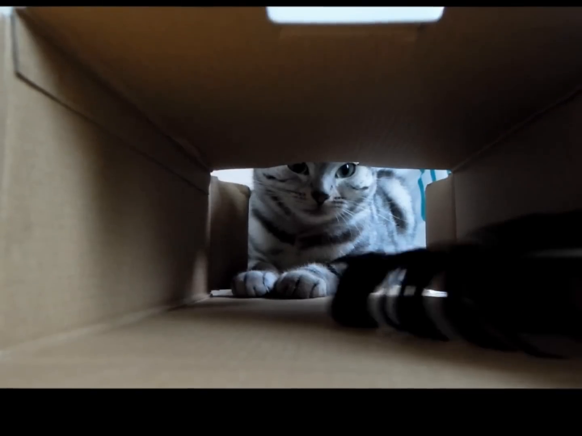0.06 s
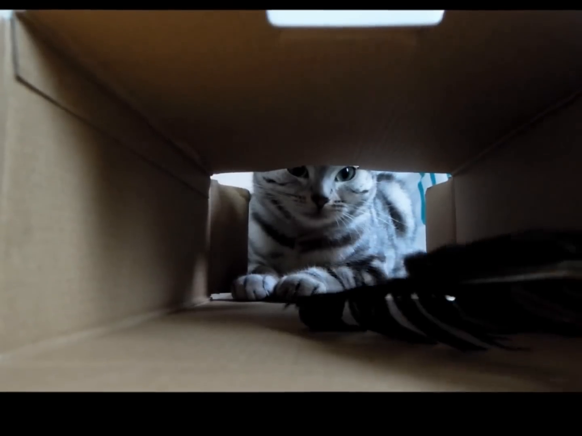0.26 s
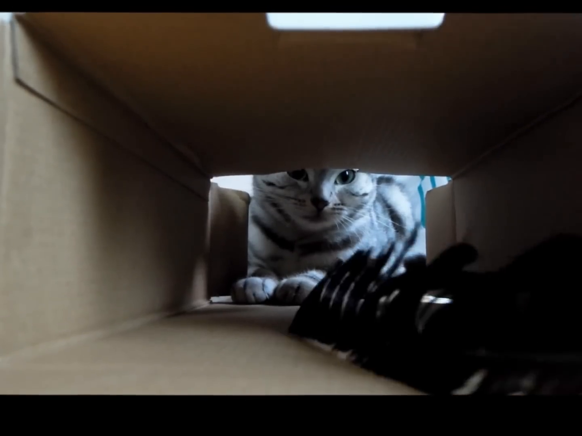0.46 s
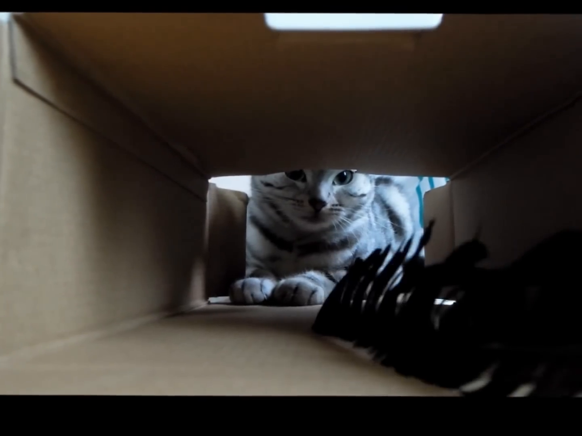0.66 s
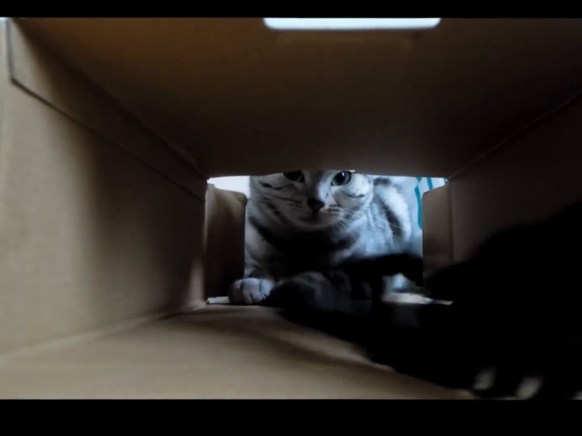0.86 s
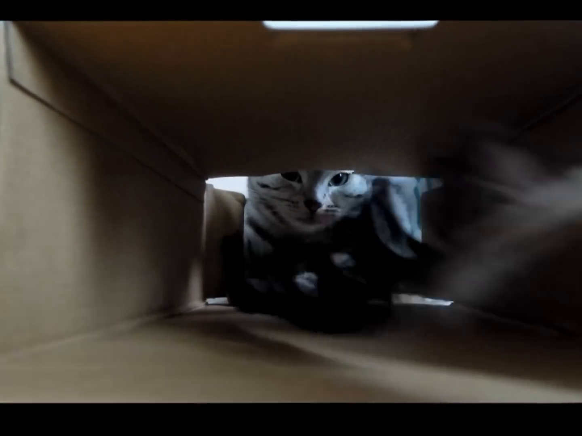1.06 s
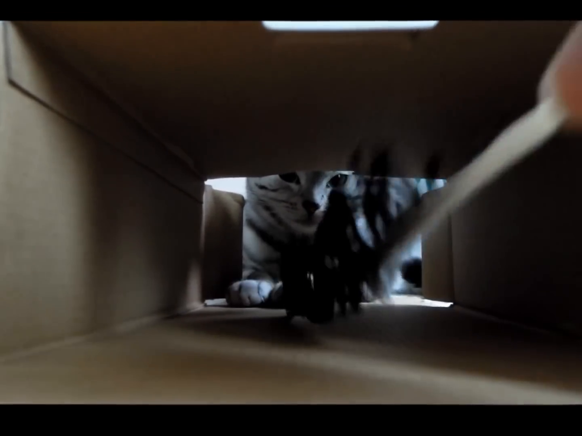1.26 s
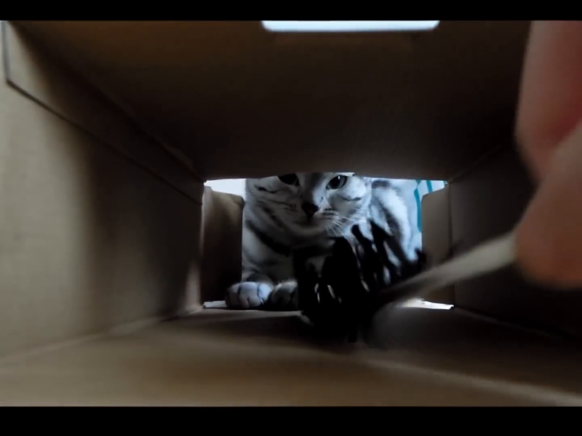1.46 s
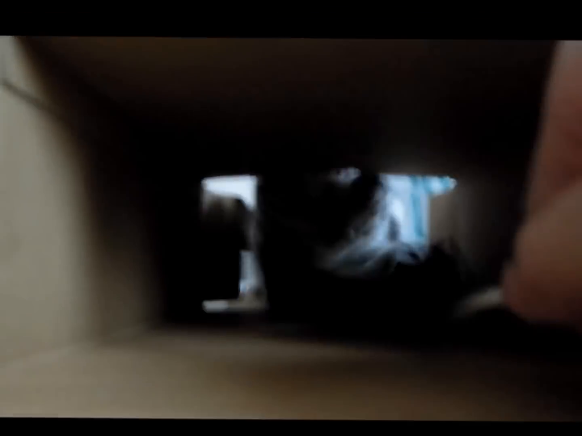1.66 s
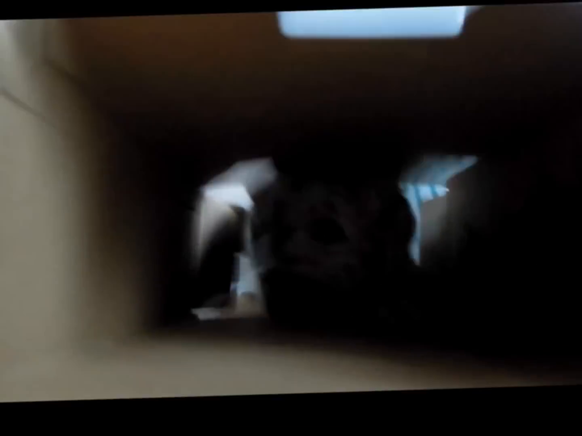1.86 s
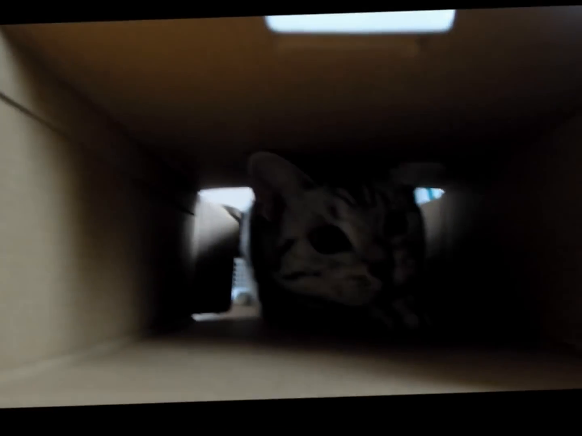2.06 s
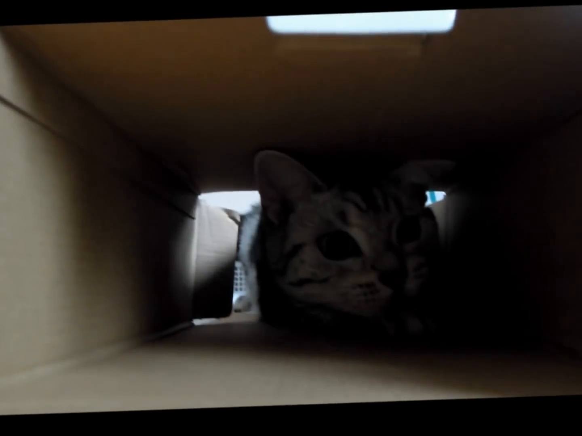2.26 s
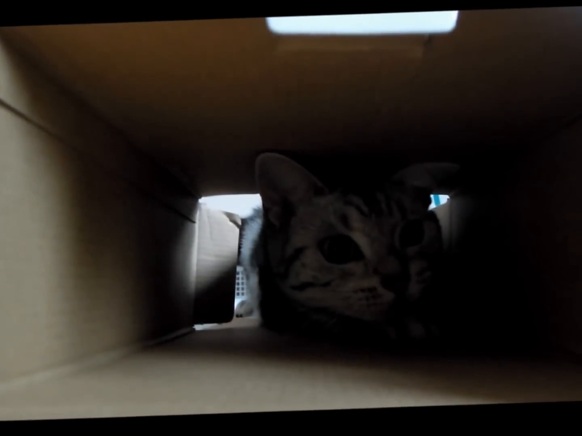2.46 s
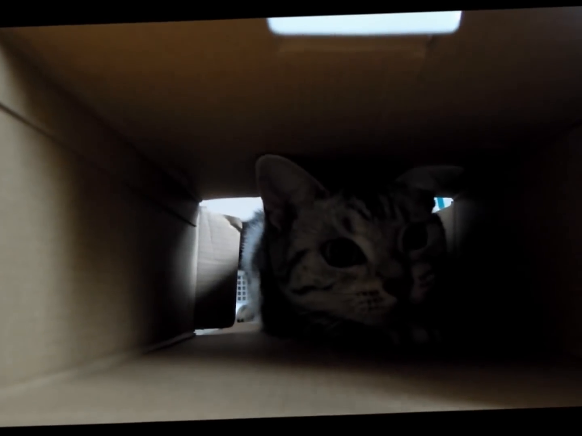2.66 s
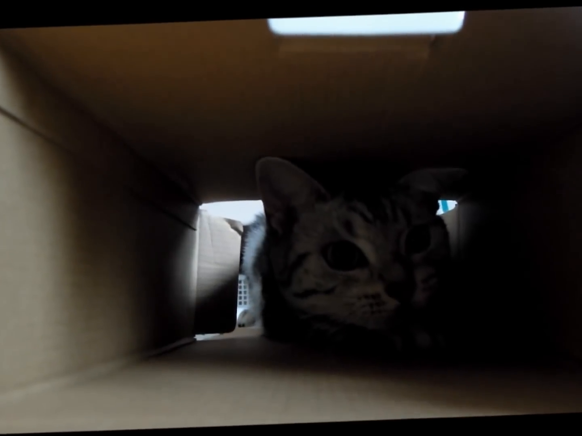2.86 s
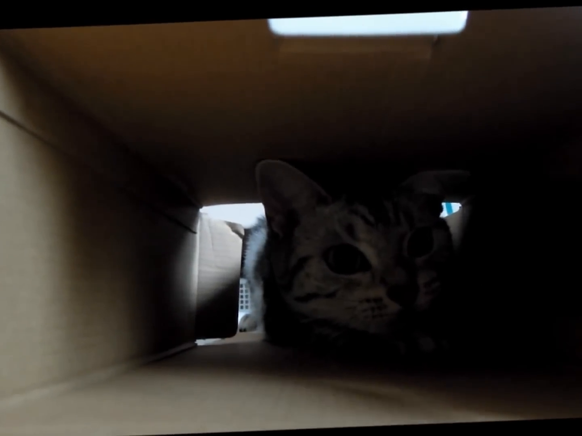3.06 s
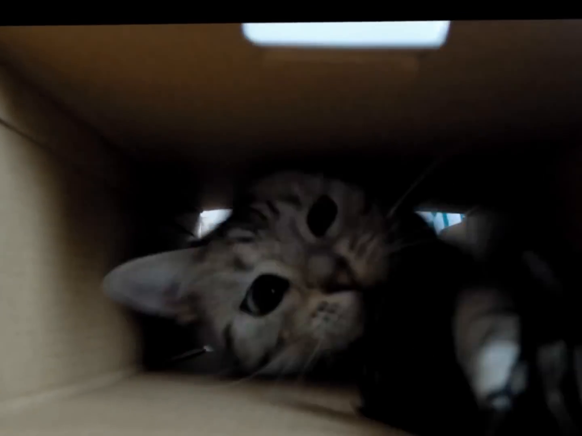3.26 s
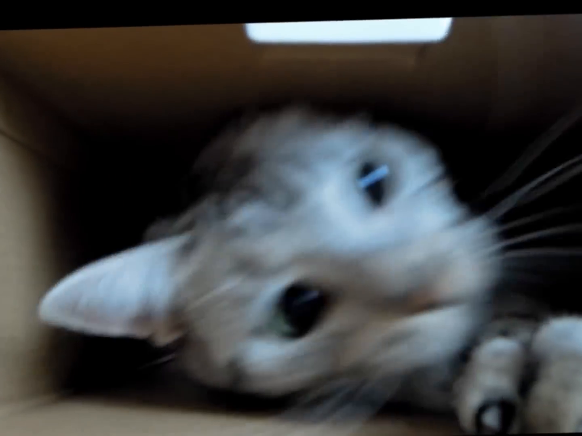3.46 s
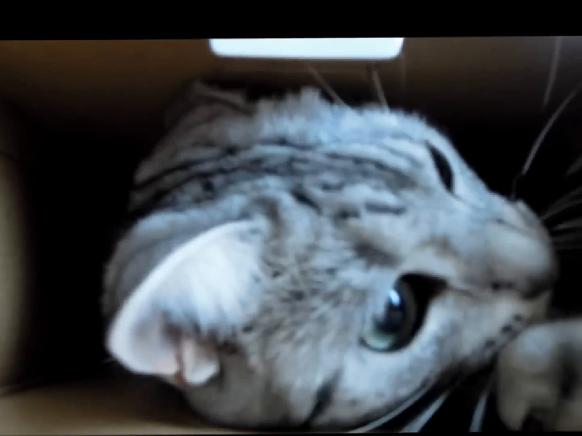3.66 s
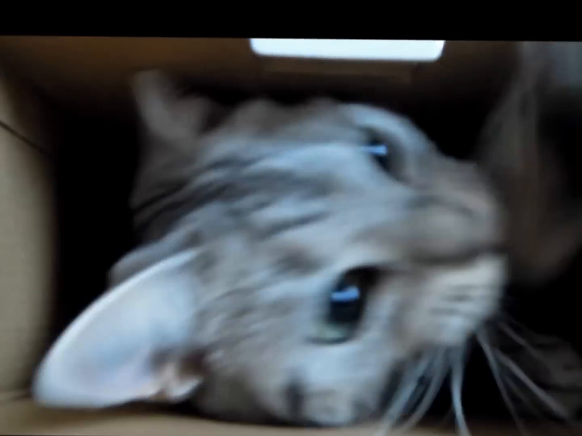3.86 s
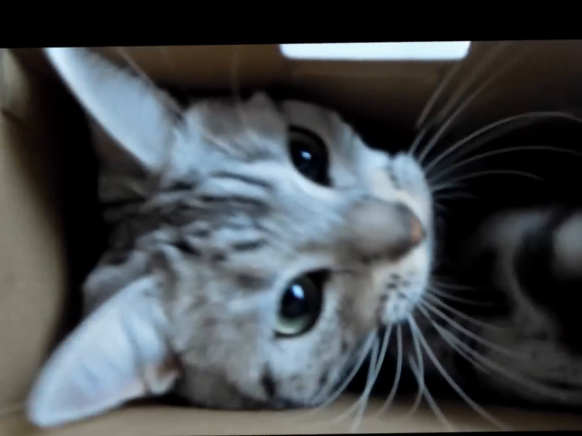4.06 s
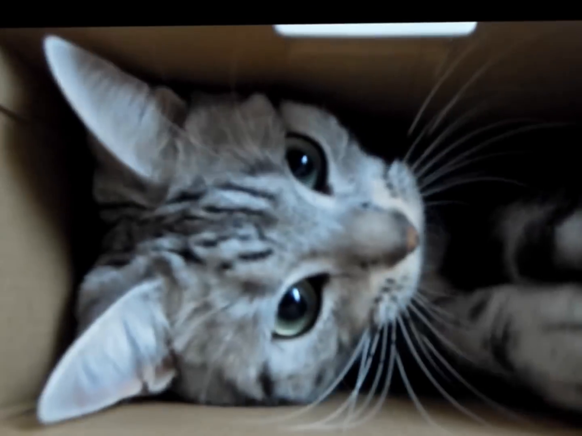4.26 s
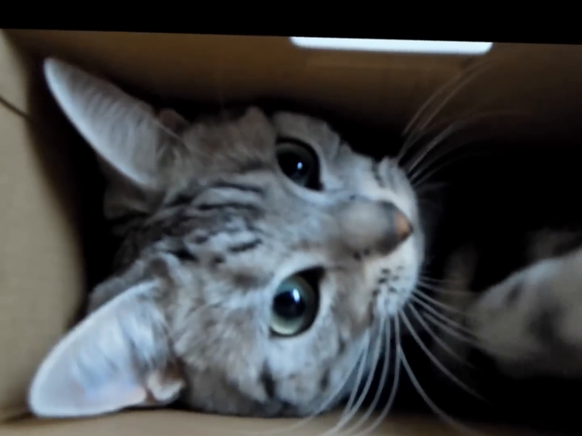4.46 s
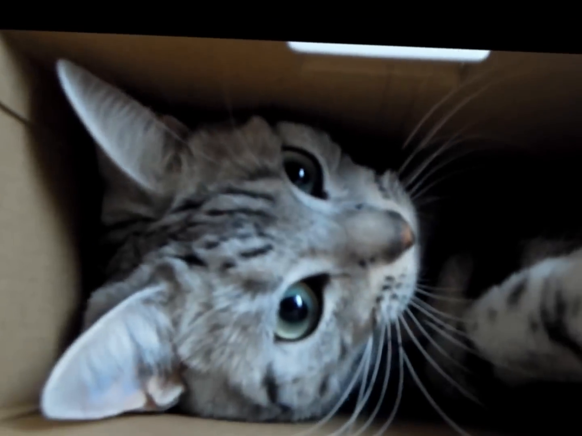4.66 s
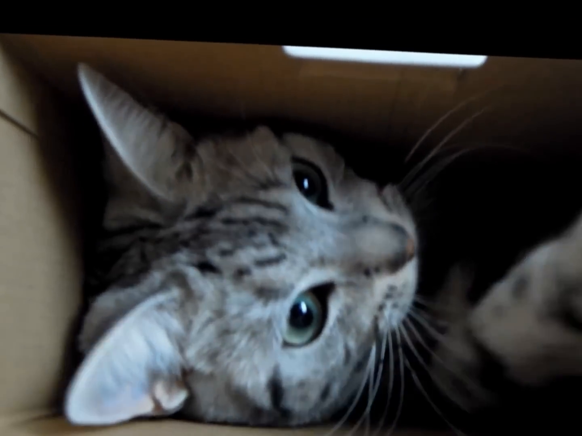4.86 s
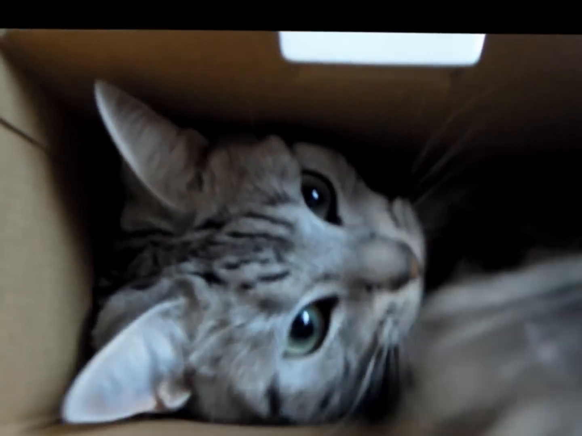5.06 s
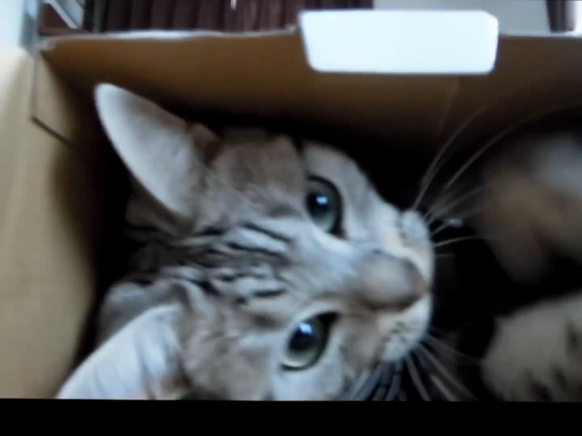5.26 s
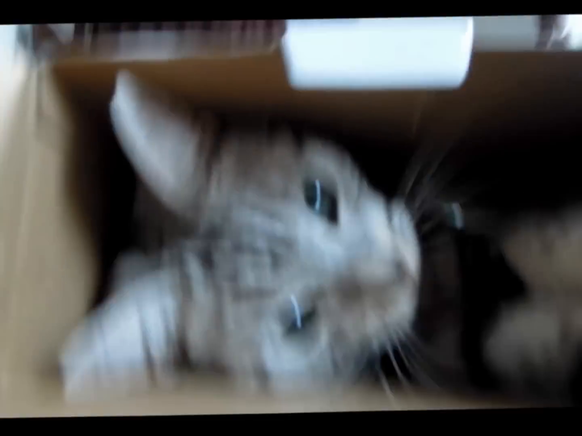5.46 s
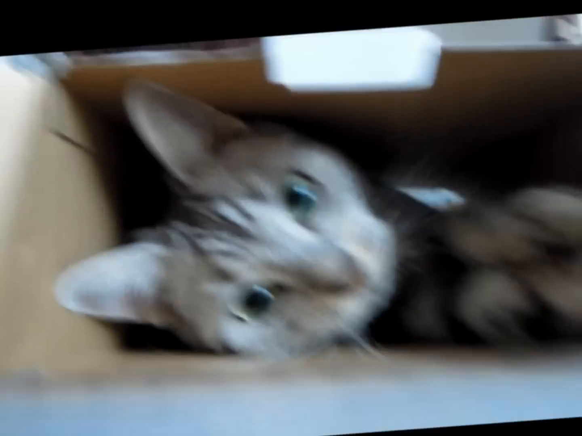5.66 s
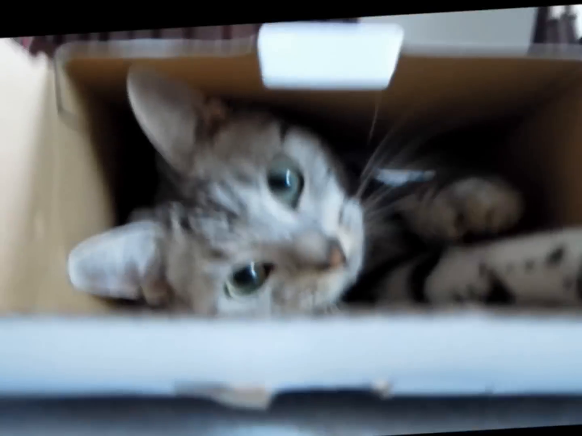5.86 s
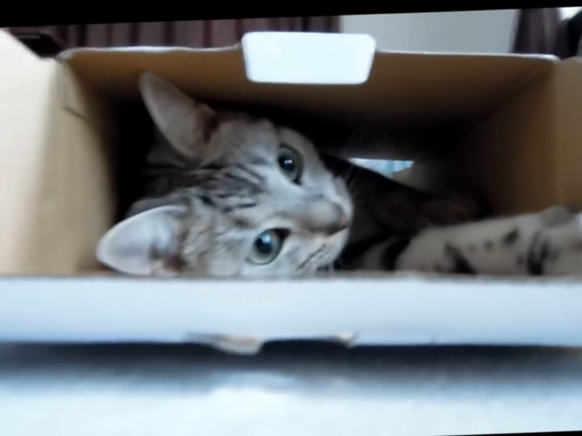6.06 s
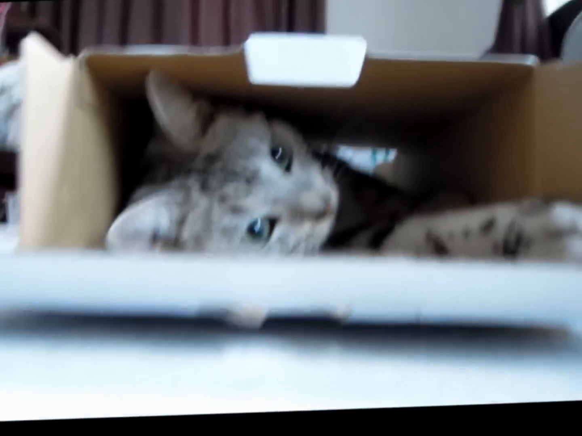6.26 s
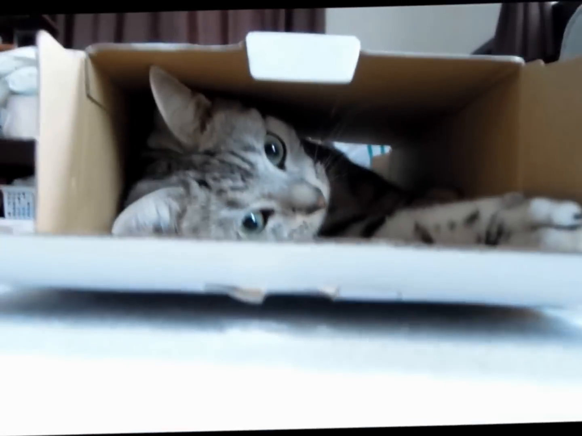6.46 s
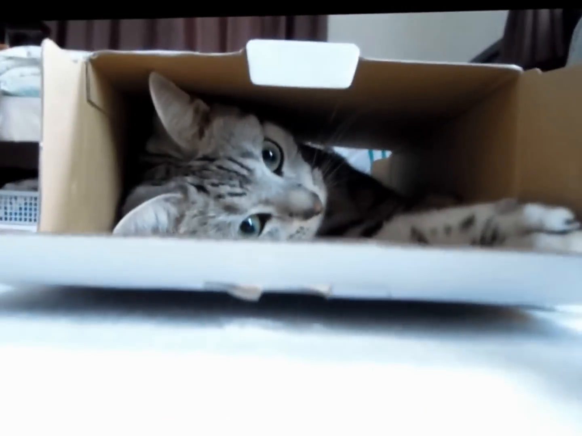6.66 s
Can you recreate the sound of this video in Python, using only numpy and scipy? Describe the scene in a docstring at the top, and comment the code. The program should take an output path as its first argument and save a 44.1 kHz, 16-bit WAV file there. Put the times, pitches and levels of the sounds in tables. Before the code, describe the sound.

Close, dry stereo from within a cardboard box in a room with faint low hiss. Light feather strokes and ticks come first, then a sudden heavy pounce full of thumps, claw taps and rustle. After a near-silent pause a double knock marks the kitten rolling over; isolated taps and fur rubs follow. Finally loud bright snaps, brief creaks and scrapes crowd the left side, thinning to soft rustling.

```python
"""Rustling brushes, sharp snaps, taps, a juddering creak and hollow thumps inside a cardboard box.
A kitten pounces on a feather toy: fur, feathers and paws rub the walls (grainy noise), its claws snap
and tap the board (short bursts and pushes through resonances), its body thumps it (damped swings).
The sounds lean left, most of all near the end, after the cat rolls onto its side.
A bass-heavy hiss, coloured noise whose level drifts slowly, lies under it all."""
import sys
import numpy as np
from scipy import signal
from scipy.fft import rfft, irfft, next_fast_len
from scipy.io import wavfile
from scipy.ndimage import uniform_filter1d, map_coordinates

SR = 44100
rng = np.random.default_rng(int(sys.argv[2]) if len(sys.argv) > 2 else 0)


def int16_out(signal):
    """Quantize to a 16-bit WAV file."""
    q = np.round(np.clip(np.atleast_2d(signal).T, -1, 1) * 32767)
    wavfile.write(sys.argv[1], SR, q.astype(np.int16))


N = 295911

# where the cat is, as the left-right difference that the treble approaches: t/s, left minus right/dB
PLACE = [(0, 3.5), (4.2, 1.5), (4.45, 6), (6.71, 11)]
# how alike left and right are in rubbing and in the box's answer: f/Hz, likeness (1 = the same)
RUB_ALIKE = [(200, 0.91), (1000, 0.93), (3000, 0.52), (10000, 0.062)]


def amp(db):
    """Gain of a level in dB."""
    return 10 ** (np.asarray(db) / 20)


def unit(x):
    """x at rms 1."""
    return x / np.sqrt(np.mean(x ** 2) + 1e-20)


def along(points, hz):
    """Values between (Hz, value) points, on a logarithmic frequency axis."""
    f, v = np.transpose(points)
    return np.interp(np.log(hz + 1), np.log(f + 1), v)


def curves(rows):
    """One value per sample for each column after the time."""
    s, *cols = np.transpose(rows)
    return [np.interp(np.arange(N) / SR, s, c) for c in cols]


def wobble(rate):
    """A smooth random curve through `rate` random points a second."""
    points = rng.standard_normal(int(N * rate / SR) + 4)
    return map_coordinates(points, [np.arange(N) * rate / SR])


def filtered(x, response):
    """x times a complex response of frequency."""
    m = next_fast_len(x.shape[-1] + 8192)
    spectrum = rfft(x, m) * response(np.fft.rfftfreq(m, 1 / SR))
    return irfft(spectrum, m)[..., :x.shape[-1]]


def peak(f, hz, width):
    """One resonance of gain 1 at its centre, which rings only after it is driven."""
    return 1j * f * width / (hz * hz - f * f + 1j * f * width)


def sides(db):
    """Left and right gains for a level difference."""
    return amp(np.array([db / 2, -db / 2]))


def pair(source, spectrum, alike):
    """Two unrelated signals coloured and mixed to a stereo pair whose mid has rms 1."""
    def mid_and_side(hz):
        turn = np.arccos(np.clip(along(alike, hz), -1, 1)) / 2
        return amp(along(spectrum, hz)) * [np.cos(turn), np.sin(turn)]

    mid, side = filtered(source, mid_and_side)
    return np.array([mid + side, mid - side]) / np.std(mid)


def place_at(s):
    """The cat's place, as a left-right difference in dB, at time s."""
    return np.interp(s, *np.transpose(PLACE))


def placed(x, place_db):
    """Sound from the side is louder on the left; the near wall's echo thins four bands of it."""
    aside = np.clip(place_db / 4 - 1, 0, 1)

    def response(f):
        wall = (1 - 0.68 * aside * peak(f, 5890, 1400)) * (1 - 1.22 * aside * peak(f, 437, 800))
        wall = wall * (1 - 0.53 * aside * peak(f, 2570, 620)) * (1 - 0.5 * aside * peak(f, 11800, 13400))
        return sides(place_db * f / (f + 1500)) * wall  # bass stays nearly central

    return filtered(x, response)


def walls(f):
    """The cardboard walls resonate at a few pitches, with alternating sign."""
    # the walls' resonances: f/Hz, width/Hz, level/dB
    modes = [(94, 32, 2.5), (182, 99, 0.5), (520, 234, 2), (1070, 41, 3.5), (3330, 200, 0.5)]
    return sum((-1) ** k * amp(db) * peak(f, hz, width) for k, (hz, width, db) in enumerate(modes))


def hissing():
    """Steady noise, strongest in the bass, whose level drifts slowly."""
    # colour of the noise: f/Hz, relative level/dB
    colour = [(12, -51), (20, -3.5), (96, -10), (517, -15.5), (719, -17), (1790, -21), (14500, -29)]
    # how alike left and right are: f/Hz, likeness (1 = the same)
    likeness = [(40, 0.7), (300, 0.42), (3000, 0.038)]
    # a level in dB around which the hiss drifts
    middle_db = -51
    level = amp(middle_db + 1.84 * wobble(3.57))
    return level * pair(rng.standard_normal((2, N)), colour, likeness)


def grainy(spread_db, rate, patchy_db):
    """Friction: noise in patches of time and pitch, roughened as fibres catch and let go."""
    z = signal.stft(rng.standard_normal((2, N)), nperseg=256)[2]
    field = rng.standard_normal(z.shape[1:])
    field = uniform_filter1d(field, size=5, axis=0)  # smooth over pitch
    field = uniform_filter1d(field, size=10, axis=1)  # smooth over time
    noise = signal.istft(z * amp(patchy_db * unit(field)), nperseg=256)[1][:, :N]
    return noise * amp(spread_db * wobble(rate) + 0.46 * spread_db * wobble(40))


def rub(source, hz, s):
    """Drag that shakes the walls and brush of fur, evened in level, then heard from the cat's place."""
    # colour of paws dragging: f/Hz, relative level/dB
    drag_colour = [(60, 0.5), (250, 10), (800, 3.5), (4500, -3.5), (9000, 0.5)]
    # colour of fur and feathers brushing: f/Hz, relative level/dB
    fur_colour = [(1180, -95), (2000, -9.5), (3570, -2.5), (6440, -2), (8970, 1.5), (12200, 1), (14500, 1)]
    board = filtered(source[0], lambda f: peak(f, hz, 2.08 * hz) ** 2 + 0.18 + 0.39 * walls(f))
    drag = pair(board, drag_colour, RUB_ALIKE)
    brush = pair(source[1], fur_colour, RUB_ALIKE)
    return placed(drag, place_at(s)), placed(brush, place_at(s))


def shuffling(source):
    """Slow rubbing on the walls; its colour and place glide as the cat rolls onto its side."""
    # slow shuffling: t/s, drag level/dB, brush level/dB
    shuffle_rows = [(0, -71, -57.5), (1.35, -73, -59), (1.42, -86, -49.5), (1.74, -54.5, -51),
                    (1.9, -34, -28), (1.96, -43, -33), (2.12, -43.5, -41), (2.45, -59, -50),
                    (2.9, -74, -92), (3.27, -64.5, -58), (3.5, -42, -40.5), (3.69, -40.5, -37.5),
                    (3.72, -41, -52), (3.83, -47, -54), (3.87, -55, -57), (4.03, -52.5, -43),
                    (4.2, -47.5, -55.5), (4.9, -55, -55.5), (5.595, -46.5, -47), (5.62, -37, -39),
                    (5.75, -33, -36.5), (5.95, -44, -43.5), (6.15, -42, -43), (6.35, -48.5, -48.5),
                    (6.55, -43.5, -40)]
    roll_s, roll_length_s = 4.63, 1.9
    drag_db, fur_db = curves(shuffle_rows)
    # the source runs backwards here so that it differs from the strokes; drag centres in Hz
    near = rub(source[..., ::-1], 1540, 0)
    aside = rub(source[..., ::-1], 1950, N / SR)
    turn = np.clip((np.arange(N) / SR - roll_s) / roll_length_s, 0, 1)
    drag, fur = (1 - turn) * np.array(near) + turn * np.array(aside)
    return amp(drag_db) * drag + amp(fur_db) * fur


def strokes(source):
    """Single rubs that swell to a peak, sag and stop short when the paw lifts."""
    # strokes: t/s, rise/s, length/s, drag level/dB, brush level/dB, drag centre f/Hz
    stroke_rows = [(0.553, 0.038, 0.053, -45.5, -41.5, 1370), (0.624, 0.024, 0.052, -54, -40.5, 2500),
                   (0.733, 0.028, 0.053, -50, -39.5, 2360), (1.041, 0.053, 0.13, -53.5, -46.5, 2650),
                   (1.699, 0.013, 0.031, -49, -41.5, 2300), (1.766, 0.0057, 0.052, -32.5, -30, 2280),
                   (1.822, 0.008, 0.024, -23, -25.5, 2380), (1.852, 0.011, 0.018, -28, -17, 2400),
                   (2.038, 0.018, 0.046, -29.5, -30, 2950), (2.172, 0.09, 0.063, -46.5, -32, 2780),
                   (3.289, 0.0088, 0.059, -45, -52, 2530), (3.355, 0.021, 0.1, -44.5, -38, 2580),
                   (3.47, 0.0068, 0.048, -26.5, -45, 1980), (3.725, 0.012, 0.042, -36, -51, 1880),
                   (3.785, 0.012, 0.045, -38, -52, 1630), (3.901, .025, 0.021, -35, -68, 1510),
                   (4.112, 0.0023, 0.019, -34.5, -69, 780), (4.228, 0.0042, 0.013, -24, -33.5, 1530),
                   (4.343, 0.019, 0.039, -40, -51, 1500), (4.424, 0.0092, 0.0098, -34.5, -36, 1900),
                   (4.693, 0.00077, 0.007, -41, -20.5, 3460), (4.7, 0.053, 0.058, -35, -29.5, 2750),
                   (4.914, 0.018, 0.032, -43, -25, 3800), (5.053, 0.0011, 0.037, -59, -26.5, 3900),
                   (5.11, 0.035, 0.069, -39.5, -41.5, 1380), (5.19, 0.027, 0.08, -41, -33.5, 2760),
                   (5.304, 0.04, 0.05, -30, -35.5, 1530), (5.403, 0.023, 0.032, -34, -34.5, 1840),
                   (5.711, 0.0017, 0.042, -24, -50, 2940), (5.773, 0.035, 0.054, -27, -46, 2180),
                   (5.827, 0.053, 0.083, -31.5, -37, 2700), (6.221, 0.0046, 0.018, -38.5, -32, 2610)]
    start_db, sag_db, lift_db = -9.5, -2.5, -18  # relative to the peak
    lift_s = 0.026
    out = np.zeros((2, N))
    for s, rise, length, drag_db, fur_db, hz in stroke_rows:
        i = round(s * SR)
        piece = source[..., i:i + round((length + lift_s) * SR)]
        t = np.arange(piece.shape[-1]) / SR
        times = [0, np.clip(rise, 0, length), length, length + lift_s]
        shape = amp(np.interp(t, times, [start_db, 0, sag_db, lift_db]))
        drag, fur = rub(piece, hz, s)
        out[:, i:i + len(t)] += shape * (amp(drag_db) * drag + amp(fur_db) * fur)
    return out


def rubbing():
    """Paws drag with sudden catches of fibre while fur brushes; both feed the shuffle and strokes."""
    catches_per_s, catch_db = 170, 17.5
    drag = grainy(2.65, 300, patchy_db=2.0)
    brush = grainy(0.24, 570, patchy_db=2)
    catches = (rng.random(N) < catches_per_s / SR) * rng.standard_normal((2, N))
    source = np.array([drag + amp(catch_db) * catches, brush])
    return shuffling(source) + strokes(source)


def swell_and_fade(t, rise, t60):
    """A fast rise, then a fade by 60 dB in t60 seconds."""
    return (1 - np.exp(-t / rise)) * amp(-60 * t / t60)


def thumps():
    """A soft blow bends a wall: a damped swing with a dull rattle in the walls' low modes."""
    # body and paw thumps and hollow pops of the board: t/s, peak level/dB, f/Hz, t60/s
    thump_rows = [(0.02, -35.5, 173, 0.15), (1.794, -18, 490, 0.27), (1.822, -12, 174, 0.3),
                  (1.868, -17, 456, 0.054), (1.875, -30, 203, 0.59), (1.935, -30, 469, 0.37),
                  (1.939, -26.5, 1250, 0.028), (2.083, -29, 1280, 0.053), (2.359, -22, 96, 0.13),
                  (2.372, -23, 174, 0.17), (2.37, -29, 535, 0.17), (3.348, -34.5, 443, 0.48),
                  (3.458, -13.5, 486, 0.055), (3.471, -9.5, 288, 0.044), (4.117, -27, 400, 0.17),
                  (4.211, -23, 400, 0.047), (5.408, -28.5, 156, 0.21), (5.632, -29, 223, 0.098),
                  (5.759, -33, 117, 0.11)]
    rise_s, rattle_gain = 0.00027, 0.78
    drift = 0.35  # the swing loses its phase: radians per root of a cycle
    out, t = np.zeros(N + SR), np.arange(SR // 4) / SR
    for s, db, hz, t60 in thump_rows:
        noise = rng.standard_normal(len(t))
        rattle = unit(filtered(noise, lambda f: (walls(f) + 0.18) * peak(f, hz, min(2 * hz, 380)) ** 2))
        wander = drift * np.cumsum(rng.standard_normal(len(t))) * np.sqrt(hz / SR)
        swing = np.sin(2 * np.pi * hz * t + wander)
        blow = swell_and_fade(t, rise_s, max(t60, 0.02)) * (swing + rattle_gain * rattle)
        out[round(s * SR):][:len(t)] += amp(db) * blow / np.abs(blow).max()
    return out[:N]


def ticks():
    """Feather barbs and whiskers tick: bright, fast-fading noise, different on each side."""
    # dry ticks: t/s, peak level/dB
    tick_rows = [(0.306, -22), (0.3668, -33), (0.423, -26.5), (0.5756, -24), (2.3718, -21), (5.6953, -8.5),
                 (6.267, -28), (6.2943, -24)]
    t60 = 0.01  # seconds
    out, t = np.zeros((2, N + SR)), np.arange(1024) / SR
    for s, db in tick_rows:
        noise = amp(-60 * t / t60) * rng.standard_normal((2, len(t)))
        tick = filtered(noise, lambda f: peak(f, 11100, 22000) ** 2)
        out[:, round(s * SR):][:, :len(t)] += amp(db) * tick / np.abs(tick.mean(0)).max()
    return out[:, :N]


def snaps():
    """The board bends, then lets go: a knock and a sharper click, then the walls answer."""
    # claw and quill snaps: t/s, level/dB, knock centre f/Hz, click level over the knock/dB
    snap_rows = [ (1.797, -16.5, 810, -21), (1.82, -6.5, 1240, -9.5), (1.833, -15, 1010, -19),
                 (1.858, -12.5, 800, 4), (2.379, -27.5, 690, 10), (2.721, -35.5, 1630, 7.5),
                 (3.461, -2, 970, -4), (3.47, -3, 1290, -7.5), (3.601, -20.5, 970, -4),
                 (4.212, -3.5, 1270, -12), (4.434, -35, 2030, 19.5), (4.44, -20.5, 1430, 14),
                 (4.621, -29, 1630, -30), (4.643, -24.5, 1150, -32), (5.102, -28, 1320, -10),
                 (5.296, -12.5, 2840, 8.5), (5.363, -33, 1500, -25), (5.614, -29.5, 1420, 10),
                 (5.624, -19, 1260, -32), (5.7, 5, 3060, -33), (5.717, -1, 2060, -4.5),
                 (5.886, -15, 3900, -30), (5.906, -12, 3740, -35), (5.911, -13.5, 3860, -26),
                 (5.947, -14.5, 3570, 0), (5.957, -5.5, 3400, 8), (5.992, -29.5, 1280, 7.5),
                 (6.317, -27.5, 2930, -7)]
    lead_s = 0.0004  # each burst starts this long before its listed time
    knock_t60_s, knock_cycles, click_t60_s = 0.0038, 9.5, 0.0072  # a knock rings on for some cycles
    out, t = np.zeros((2, N + SR)), np.arange(2048) / SR

    def burst_noise(t60, width):
        middle, side = rng.standard_normal((2, len(t)))
        return t * amp(-60 * t / t60) * (middle + width * side * [[1], [-1]])

    for s, db, hz, click_db in snap_rows:
        knock = burst_noise(knock_t60_s + knock_cycles / hz, 0.4)
        knock = filtered(knock, lambda f: peak(f, hz, 600 + 0.69 * hz) ** 2)
        click = burst_noise(click_t60_s, 0.68)
        click = filtered(click, lambda f: peak(f, 2900, 19000) * peak(f, 7400, 6900))
        burst = knock / np.abs(knock.mean(0)).max()
        burst = burst + amp(click_db) * click / np.abs(click.mean(0)).max()
        out[:, round((s - lead_s) * SR):][:, :len(t)] += amp(db) * placed(burst, place_at(s))
    return filtered(out[:, :N], lambda f: 1 + 0.24 * walls(f))


def pushes(rows):
    """Each push is a single pulse through a broad resonance, which gives the recoil."""
    relative_width = 0.86  # width of the resonance over its centre
    out, push = np.zeros((2, N + SR)), np.eye(1, 2048).repeat(2, axis=0)
    for s, db, hz in rows:
        tap = filtered(push, lambda f: peak(f, hz, relative_width * hz) ** 2)
        tap = placed(tap / np.abs(tap).max(), place_at(s))
        out[:, round(s * SR):][:, :tap.shape[1]] += amp(db) * tap
    return out[:, :N]


def taps():
    """A claw tip or knuckle hits hard once: one push and its recoil."""
    # hard taps: t/s, level/dB, centre f/Hz
    tap_rows = [(1.8262, -6, 866), (1.8452, -13, 1280), (1.8661, -7, 1620), (2.1026, -13, 3600),
                (3.371, -23.5, 140.3), (3.461, 3, 1740), (3.47, 0.5, 1180), (3.665, -28.5, 690),
                (4.1137, -20.5, 750), (4.2326, -10, 2170), (5.405, -21.5, 186), (5.957, -14.5, 940)]
    return pushes(tap_rows)


def rocks():
    """The whole box rocks: a slow-starting, fading low tone."""
    # rocking: t/s, level/dB
    rock_rows = [(1.852, -21), (2.056, -36), (3.857, -31.5)]
    rock_hz, rise_s, t60_s = 50, 0.0048, 0.28
    out, t = np.zeros(N + SR), np.arange(SR // 4) / SR
    swing = swell_and_fade(t, rise_s, t60_s) * np.sin(2 * np.pi * rock_hz * t)
    for s, db in rock_rows:
        out[round(s * SR):][:len(t)] += amp(db) * swing
    return out[:N]


def creaks():
    """A claw judders along the ribs of the board: a quick run of uneven slips, each one a push."""
    # creaks: t/s, length/s, middle level of the slips/dB, middle centre of the slips f/Hz
    creak_rows = [(5.335, 0.015, -17, 1540), (5.795, 0.019, -15.5, 1860)]
    slip_s = 0.0024  # mean time between slips
    slips = []
    for s, length, db, hz in creak_rows:
        for t in np.arange(0, length, slip_s):
            slip_time = s + t + rng.normal(0, slip_s / 5)
            slips.append((slip_time, db + rng.normal(0, 3.3), hz * amp(rng.normal())))
    return pushes(slips)


def hollow(x, t60):
    """Box and room answer with a short fading blur, its own on each side in the treble."""
    t = np.arange(SR // 4) / SR
    noise = rng.standard_normal((2, len(t))) * amp(-60 * t / t60)
    tail = filtered(noise, lambda f: peak(f, 680, 8400) ** 2)
    tail = pair(tail, [(1000, 0)], RUB_ALIKE)  # no further colour
    return signal.fftconvolve(x, tail / np.linalg.norm(tail[0]), axes=1)[:, :N]


def scene():
    """All sources over the hiss; only the hits get the hollow answer."""
    hits = thumps() + snaps() + taps() + rocks() + creaks()
    answer = amp(-15.0) * hollow(hits, t60=0.054)
    return hissing() + rubbing() + ticks() + hits + answer


def record(dry):
    """The loudest peaks flatten smoothly; a steep filter removes the highest treble."""
    # upper band limit: f/Hz
    top_hz = 14300
    clipped = dry / (1 + np.abs(dry) ** 8) ** (1 / 8)
    return filtered(clipped, lambda hz: 1 / (1 + (hz / top_hz) ** 300))


dry = scene()
out = record(dry)
int16_out(out)
```